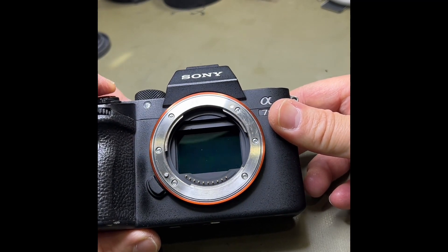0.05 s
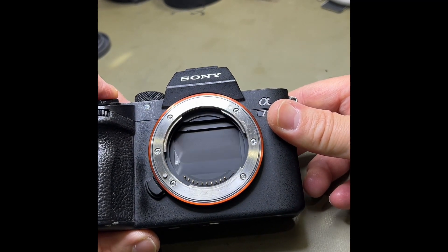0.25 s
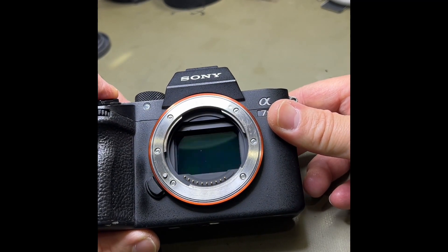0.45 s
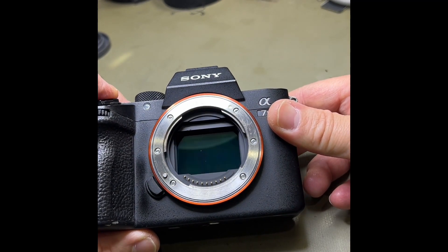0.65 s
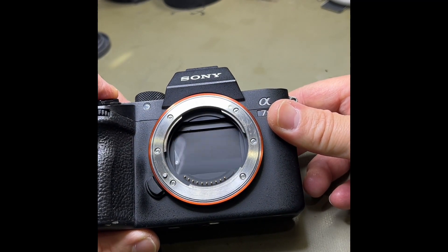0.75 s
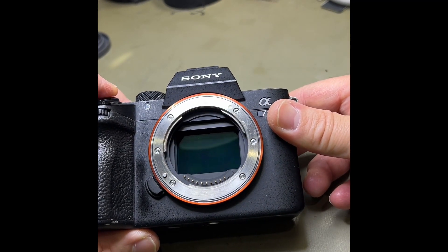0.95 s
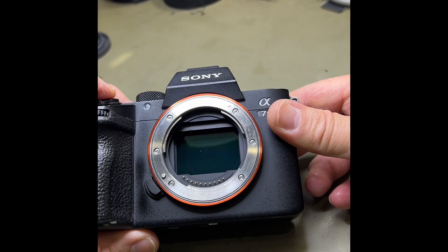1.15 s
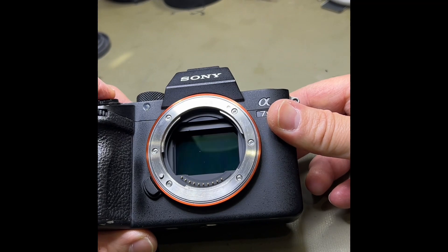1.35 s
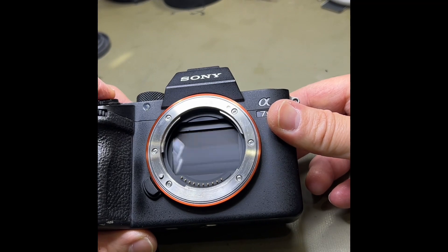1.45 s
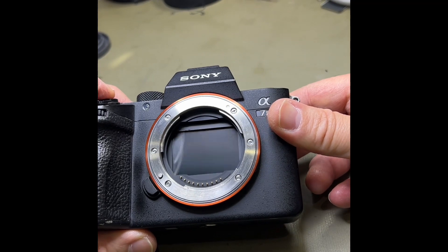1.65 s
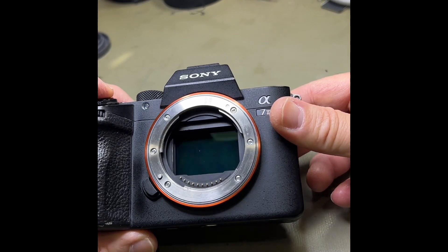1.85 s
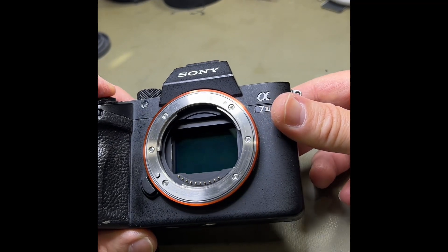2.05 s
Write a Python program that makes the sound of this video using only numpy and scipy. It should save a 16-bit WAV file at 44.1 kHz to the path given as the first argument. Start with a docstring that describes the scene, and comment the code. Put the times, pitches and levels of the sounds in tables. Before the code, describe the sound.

A camera shutter fires two rapid bursts of sharp mechanical clacks, close up.

```python
"""A small room with a low rumble, a camera close to a stereo microphone pair.
Its mechanical shutter fires two bursts, five frames and then four, at six frames a second.
In each frame a latch ticks, a curtain slams, gears recock the blades, a second latch trips
and the other curtain slams. Springs ring on faintly and the room gives a short tail.
A soft tick comes before each burst and after the last."""
import sys
import numpy as np
from scipy import signal
from scipy.fft import rfft, irfft
from scipy.io import wavfile
from scipy.ndimage import uniform_filter1d

SR = 44100
rng = np.random.default_rng(int(sys.argv[2]) if len(sys.argv) > 2 else 0)


def master_out(mix):
    """Clip the mix to full scale and print it as 16-bit PCM to the path in sys.argv[1]."""
    frames = np.transpose(np.atleast_2d(mix))
    ceiling = np.clip(frames, -1, 1)
    pcm = np.round(ceiling * 32767).astype(np.int16)
    wavfile.write(sys.argv[1], SR, pcm)


N = 92610
BLOCK = 4096  # samples in one short sound
PEAK_S = .005  # a blow peaks this far into its block


def amp(db):
    """Decibels to gain."""
    return 10 ** (np.asarray(db) / 20)


def unit(x):
    """Scales to rms 1."""
    return x / np.sqrt(np.mean(x ** 2) + 1e-20)


def read(points, hz):
    """Reads a table on a log-frequency axis."""
    table_hz, value = np.transpose(points)
    return np.interp(np.log(hz + 1), np.log(table_hz + 1), value)


def bins(size):
    """Frequencies of a spectrum."""
    return np.fft.rfftfreq(size, 1 / SR)


def add(mix, s, sound):
    """Mixes a sound in at time s."""
    part = mix[..., max(round(s * SR), 0):][..., :sound.shape[-1]]
    part += sound[..., :part.shape[-1]]


def stereo_noise(size, likeness):
    """Noise whose left and right are partly alike, band by band."""
    left, other = rfft(rng.standard_normal((2, size)))
    alike = read(likeness, bins(size))
    return irfft(np.array([left, alike * left + np.sqrt(1 - alike ** 2) * other]), size)


def causal(gain):
    """Spectrum of the filter with this gain that only rings after the blow."""
    log = np.log(np.maximum(gain, 1e-5))
    return np.exp(np.conj(signal.hilbert(np.r_[log, log[-2:0:-1]])))[:len(gain)]


def resonances(tone, bass_edge_hz=219):
    """Response of a part, with energy 1; a small body radiates little bass."""
    hz = bins(BLOCK)
    return causal(unit(amp(read(tone, hz)) * hz ** 2 / (hz ** 2 + bass_edge_hz ** 2)))


def blow(part, grain, rise_s, fall_s, chatter_db, chatter_s, side_db=-11):
    """A cluster of tiny contacts swells, peaks and chatters out through the part's resonances."""
    t, hz = np.arange(BLOCK) / SR - PEAK_S, bins(BLOCK)
    after = np.maximum(t, 0)
    decay = np.exp(-after / fall_s) + amp(chatter_db) * np.exp(-after / chatter_s)
    shape = np.exp(np.minimum(t, 0) / rise_s) * decay
    force = rfft(grain * shape)
    force = unit(abs(force)) * np.exp(1j * np.angle(force))
    colour = np.sqrt(uniform_filter1d(abs(force) ** 2, size=21) + .037)
    force = force / causal(colour)  # flattened, so the part sets the tone
    side = rfft(rng.standard_normal(BLOCK) * shape) / np.linalg.norm(shape)
    side *= amp(side_db) * hz / (hz + 2000)
    lag_s = .002165 / (1 + (hz / 800) ** 2)  # the heavy body answers later than the blades
    lag = np.exp(-2j * np.pi * np.cumsum(lag_s) * SR / BLOCK)
    return irfft(np.array([force + side, force - side]) * part * lag)


def strike(mix, s, db, sound):
    """Mixes a blow in so that it peaks at time s."""
    add(mix, s - PEAK_S, amp(db) * sound)


# Room tone, all around the pair. Each row: frequency in Hz, relative level in dB.
RUMBLE_TONE = [(15, -30), (30, -11), (42, 0.5), (55, 2), (75, -2.5), (100, -4), (130, -8.5), (185, -13.5),
               (245, -2), (320, -13), (450, -16), (620, -21.5), (1000, -27.5), (2000, -35.5), (3500, -44),
               (5000, -57), (10000, -65), (16000, -78)]
# Its stereo width. Each row: frequency in Hz, left-right likeness from 0 to 1.
RUMBLE_LIKENESS = [(60, 1), (120, .995), (250, .95), (600, .7), (1500, 0.66), (8000, .3)]

def rumble(level_db=-44.5):
    """The room rumbles steadily, low and near the centre."""
    spectrum = rfft(stereo_noise(N, RUMBLE_LIKENESS)) * amp(read(RUMBLE_TONE, bins(N)))
    return amp(level_db) * unit(irfft(spectrum, N))


# Soft ticks, close to the microphone. Each row: time in seconds, level in dB.
TICKS = [(.1262, -23.5), (1.1528, -26.5), (2.0864, -27.5)]
# The ticking part's resonances. Each row: frequency in Hz, relative level in dB.
TICK_TONE = [(250, -3), (900, 4), (2000, -8.5), (2700, -3.5), (2850, 1.5), (3020, -11.5), (6000, -18.5),
             (8000, -14.5), (10000, -19), (15500, -31.5)]

def ticks():
    """The mechanism ticks once before each burst and once after the last."""
    out, part = np.zeros((2, N)), resonances(TICK_TONE)
    for s, db in TICKS:
        grain = rng.standard_normal(BLOCK)
        strike(out, s, db, blow(part, grain, rise_s=.0004, fall_s=.001, chatter_db=-15.5, chatter_s=.004))
    return out


# The shutter, close up. Each row: first slam's time in seconds and level trim in dB,
# second slam's time in seconds and level trim in dB, gear level trim in dB.
FRAMES = [(0.2034, -1.6, .2790, -0.5, 0), (0.3704, .2, .4459, .5, 0), (0.5363, -0.8, .6125, 0, 0),
          (0.7029, -.5, .7783, -0.5, 0), (.8691, 0, .9443, -0.5, -1), (1.2670, -1, 1.3422, -1, 0),
          (1.4335, -0.16, 1.5087, 0, 0), (1.5996, -1, 1.6756, -1, -0.5), (1.7660, -0.4, 1.8414, -1.1, -0.5)]
# Resonances of the latches and of each curtain. Each row: frequency in Hz, relative level in dB.
LATCH_TONE = [(250, -18), (700, 2), (1400, -2), (2600, 0.5), (4800, -8), (6700, 0.5), (9300, -5),
              (12000, 0), (15500, -5.5)]
FIRST_CURTAIN_TONE = [(200, -25.5), (370, -7), (480, -9), (610, 2), (745, -9.5), (850, -12.5), (945, -8),
                      (1040, 0.5), (1170, 1), (1450, -9), (2030, -1), (2120, -1), (2220, 0.5), (2380, -8.5),
                      (2720, -4), (3200, -15.5), (3770, -9.5), (4100, -12), (4800, -5.5), (5200, -25.5),
                      (5750, -1.5), (6250, -15.5), (6710, 3.5), (7050, -2), (7250, -1), (7700, -9.5),
                      (8150, -0.5), (8700, -9.5), (9350, 2), (10600, -7.5), (11400, 4.5), (12200, -5.5),
                      (13400, -5.5), (16000, -11.5)]
SECOND_CURTAIN_TONE = [(200, -22), (480, -16), (560, -20), (690, -8), (820, -12), (1000, -10), (1200, -12),
                       (1650, -20), (1950, -13.5), (2060, -14), (2200, -18.5), (2350, -27), (2480, -11.5),
                       (3050, -15), (3500, -10), (4000, -7), (4900, -16), (5900, -6.5), (6500, 1.5),
                       (7200, -13), (8150, -3.5), (9200, -19.5), (10700, -12), (11700, -8), (13200, -13),
                       (14400, -8), (16000, -23)]
TRAVEL_S = .0074  # from latch to slam

def curtains(alike=.94):
    """Twice a frame a latch trips and its curtain slams, nearly the same each time."""
    out, latch = np.zeros((2, N)), resonances(LATCH_TONE)
    first, second = resonances(FIRST_CURTAIN_TONE), resonances(SECOND_CURTAIN_TONE)
    usual = rng.standard_normal((4, BLOCK))
    for first_s, first_db, second_s, second_db, _ in FRAMES:
        grains = np.sqrt(alike) * usual + np.sqrt(1 - alike) * rng.standard_normal(usual.shape)
        trip = blow(latch, grains[0], rise_s=.0006, fall_s=.00077, chatter_db=-7.5, chatter_s=.005)
        strike(out, first_s - TRAVEL_S, first_db - 9.5, trip)
        slam = blow(first, grains[1], rise_s=.0011, fall_s=.00036, chatter_db=-15, chatter_s=.0013)
        strike(out, first_s, first_db + 11, slam)
        trip = blow(latch, grains[2], rise_s=.00045, fall_s=.00067, chatter_db=-.5, chatter_s=.0066)
        strike(out, second_s - TRAVEL_S, second_db + 1, trip)
        slam = blow(second, grains[3], rise_s=.0006, fall_s=.0017, chatter_db=-17.5, chatter_s=.003)
        strike(out, second_s, second_db + 9, slam)
    return out


# Width of the swish and of the room's tail at the pair.
# Each row: frequency in Hz, left-right likeness from 0 to 1.
DIFFUSE_LIKENESS = [(200, 1), (900, 1), (2000, 0.73), (3100, .3), (4000, 0.28), (5000, .3), (6300, 1),
                    (9000, .5), (15000, .35)]

def swish(first_db=-33, second_db=-28):
    """The blades scrape along their guides between latch and slam."""
    out, part = np.zeros((2, N)), resonances(LATCH_TONE)
    in_flight = np.clip((TRAVEL_S * SR - np.arange(BLOCK)) / 20, 0, 1)
    for first_s, _, second_s, _, _ in FRAMES:
        for slam_s, db in ((first_s, first_db), (second_s, second_db)):
            scrape = stereo_noise(BLOCK, DIFFUSE_LIKENESS) * in_flight
            add(out, slam_s - TRAVEL_S, amp(db) * irfft(rfft(scrape) * part))
    return out


# The gear train's resonances, close up. Each row: frequency in Hz, relative level in dB.
GEAR_TONE = [(150, -40.5), (250, -8), (528, -5), (788, 0), (1020, -8.5), (1180, -4), (1470, -7),
             (2200, -3.5), (2710, -3), (3010, -5), (4260, -8), (5160, -9.5), (6590, -3.5), (7060, -8.5),
             (7980, -4.5), (8700, -13.5), (11700, -7.5), (14700, -8.5), (16000, -19)]
# Effort of the gears. Each row: seconds after the first slam, level in dB.
GEAR_EFFORT = [(.004, -31), (.012, -38), (.025, -33), (.031, -29.5), (.040, -28.5), (.044, -35.5),
               (.050, -27), (.060, -39.5), (.069, -28.5), (.078, -43)]
# Knocks of the cocking cam. Each row: seconds after the first slam, level in dB.
CAM_KNOCKS = [(.0195, -13.5), (.0280, -3), (.0300, -6), (.0352, -4), (.0388, -7), (.0475, -13.5),
              (.0645, -5.5)]

def gears(teeth_per_s=3500, spread_db=1, jitter_s=.0006):
    """Teeth rattle and the cam knocks while the motor recocks the blades."""
    out, part, t = np.zeros((2, N)), resonances(GEAR_TONE), np.arange(BLOCK) / SR
    effort = amp(np.interp(t, *np.transpose(GEAR_EFFORT), right=-100))
    for s, _, _, _, db in FRAMES:
        strength = amp(spread_db * np.minimum(rng.exponential(1, (2, BLOCK)), 3))
        sign = rng.choice([-1, 1], (2, BLOCK))
        contact = rng.random((2, BLOCK)) < teeth_per_s / SR
        mid, side = strength * sign * contact
        teeth = (unit(mid) + .26 * unit(side) * np.array([[1], [-1]])) * effort
        add(out, s, amp(db) * irfft(rfft(teeth) * part))
        for delay_s, knock_db in CAM_KNOCKS:
            later, louder = rng.standard_normal(2)
            grain = rng.standard_normal(BLOCK)
            knock = blow(part, grain, rise_s=.00043, fall_s=.00088, chatter_db=-4, chatter_s=.0033)
            strike(out, s + delay_s + jitter_s * later, db + knock_db + spread_db * louder, knock)
    return out


def thuds(level_db=-46, hz=55, swell_s=.02, delay_s=.012):
    """Each frame rocks the camera in the hand: a dull, low push."""
    out, t = np.zeros((2, N)), np.arange(SR // 3) / SR
    swell = t / swell_s * np.exp(1 - t / swell_s)
    for s, *_ in FRAMES:
        add(out, s + delay_s, amp(level_db) * swell * np.sin(2 * np.pi * (hz * t + rng.random())))
    return out


# Faint hums in the background, dead centre.
# Each row: start in seconds, length in seconds, pitch in Hz, level in dB.
HUMS = [(.92, .22, 436, -53), (.9, .19, 216, -54), (1.32, .17, 224, -55), (1.9, .26, 262, -55)]

def hums():
    """Low tones swell and fade, wavering a little in pitch."""
    out = np.zeros((2, N))
    for s, length_s, hz, db in HUMS:
        t = np.arange(0, length_s, 1 / SR)
        waver = unit(uniform_filter1d(rng.standard_normal(N), size=900))[:len(t)]
        phase = 2 * np.pi * np.cumsum(hz * (1 + .015 * waver)) / SR
        swell = np.sin(np.pi * t / length_s)
        add(out, s, amp(db) * np.sqrt(2) * swell * np.sin(phase))
    return out


# Springs and blades, faint even this close.
# Each row: frequency in Hz, relative level in dB, seconds to fall 60 dB.
SPRING_MODES = [(3515, -65, .24), (6370, -64, 0.13), (6480, -52, .2), (6800, -58, 0.14), (7740, -60.5, .17),
                (8168, -63, 0.16), (8527, -59.5, .2), (11600, -62, .17)]

def springs(blows, gain_db=-13.5):
    """Thin steel parts ring on after every blow."""
    t = np.arange(SR // 2) / SR
    ring = sum(amp(db - 60 * t / t60) * np.sin(2 * np.pi * hz * t) for hz, db, t60 in SPRING_MODES)
    return amp(gain_db) * signal.fftconvolve(blows, ring[None], axes=1)[:, :N]


def echo(camera, delay_s=.01, gain_db=-16, cutoff_hz=2000):
    """A nearby surface throws back the lower part of each clack."""
    hz = bins(N)
    delayed = rfft(camera) * np.exp(-2j * np.pi * hz * delay_s)
    return amp(gain_db) * irfft(delayed / (1 + 1j * hz / cutoff_hz), N)


# The small room's tail, heard from beside the camera. Each row: frequency in Hz, seconds to fall 60 dB.
ROOM_T60 = [(300, 0.1), (800, .23), (2000, .27), (5500, .29), (10000, .25), (15000, .21)]
# The colour of that tail. Each row: frequency in Hz, level in dB.
ROOM_TONE = [(200, -11), (700, -11), (1500, -15.5), (3500, -12), (6500, -14), (10000, -15.5),
             (15000, -19.5)]

def room(camera, early_db=-29.5, early_t60=.05, onset_s=.004):
    """Quick reflections off bench and hands, then a short diffuse tail."""
    hz, t, noise = signal.stft(stereo_noise(SR // 2, DIFFUSE_LIKENESS), SR, nperseg=256)
    t60 = read(ROOM_T60, hz)[:, None]
    late = amp(read(ROOM_TONE, hz)[:, None] - 60 * t / t60) / np.sqrt(t60)
    early = amp(early_db - 60 * t / early_t60) / np.sqrt(early_t60)
    tail = signal.istft(noise * np.hypot(late, early), SR, nperseg=256)[1]
    tail *= np.sqrt(2 * np.log(1000) / SR)  # the levels set the energy of the whole decay
    fade_in = np.minimum(np.arange(tail.shape[1]) / SR / onset_s, 1) ** 2
    return signal.fftconvolve(camera.mean(0)[None], tail * fade_in, axes=1)[:, :N]


def scene():
    """The camera up close, with its reflections and the room's background behind it."""
    blows = curtains() + swish() + gears() + ticks()
    camera = blows + springs(blows)
    return camera + echo(camera) + room(camera) + thuds() + rumble() + hums()


# Balance of the microphone pair. Each row: frequency in Hz, left minus right in dB.
MIC_BALANCE = [(70, -0.24), (200, -1.1), (350, -3), (750, -3.5), (1100, 0), (2700, -0.5), (6500, 1),
               (14000, -0.3)]
# Phase across the pair. Each row: frequency in Hz, the left side's lead in radians.
MIC_PHASE = [(100, 0), (600, 0), (2500, .1), (4900, .2), (5500, -1.1), (8000, -1.3), (15000, -1.6)]

def record(dry, ceiling=.96, cutoff_hz=16100):
    """The two microphones differ in level and phase; the recorder rounds peaks and cuts the top treble."""
    hz = bins(N)
    left = amp(read(MIC_BALANCE, hz) / 2) * np.exp(.5j * read(MIC_PHASE, hz))
    heard = irfft(rfft(dry) * np.array([left, 1 / left]), N)
    rounded = heard / (1 + (heard / ceiling) ** 6) ** (1 / 6)
    lowpass = signal.firwin(255, cutoff_hz, window=("kaiser", 9), fs=SR)
    return signal.oaconvolve(rounded, lowpass[None], "same")


dry = scene()
out = record(dry)
master_out(out)
```